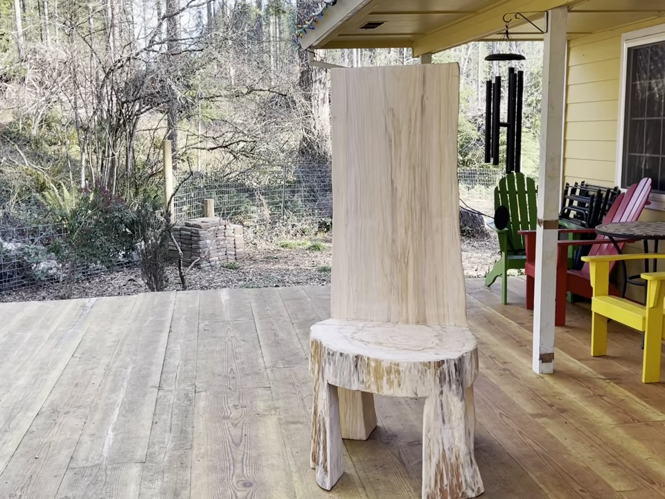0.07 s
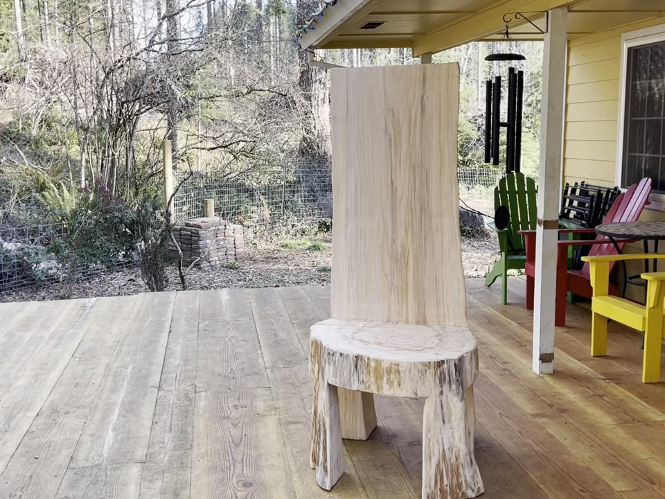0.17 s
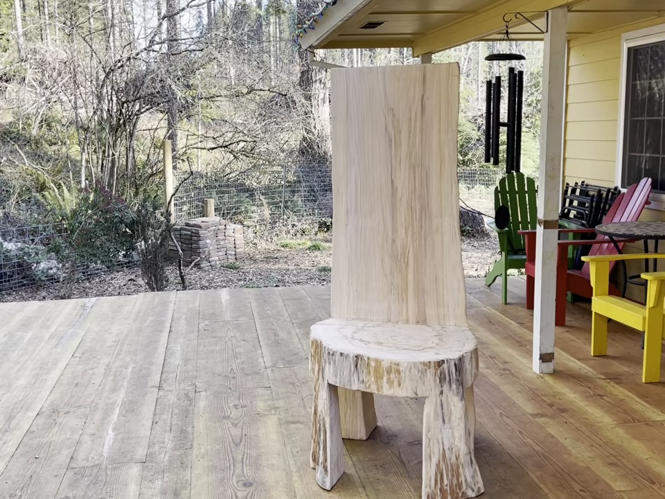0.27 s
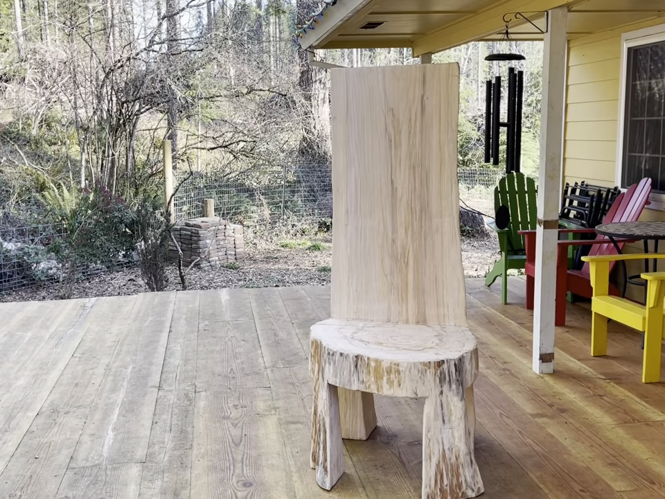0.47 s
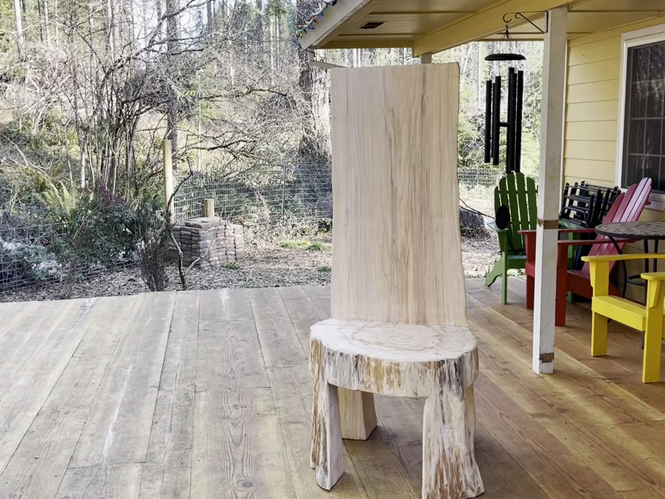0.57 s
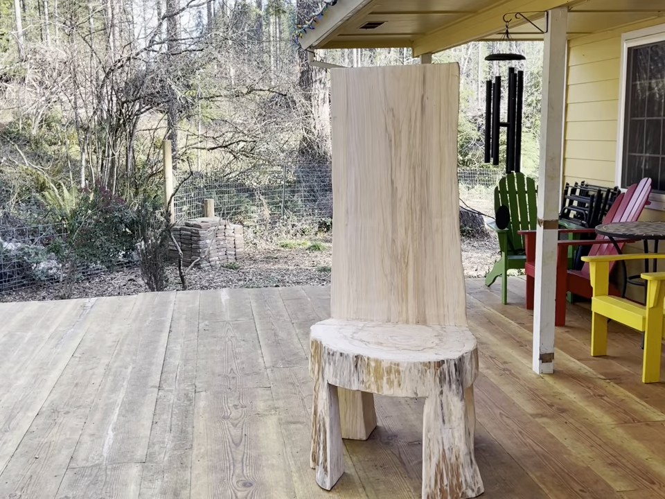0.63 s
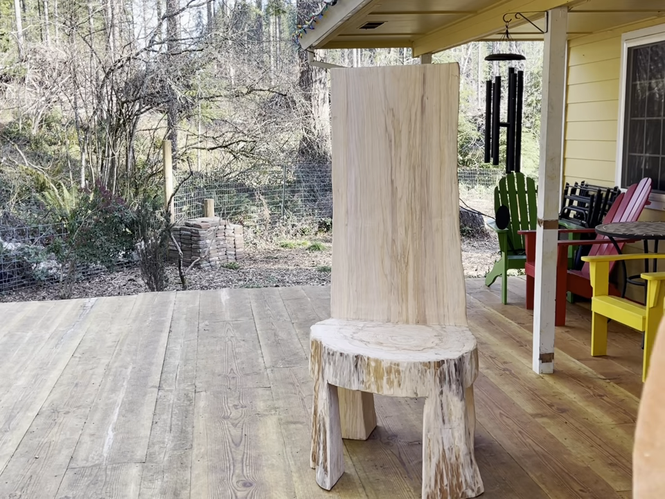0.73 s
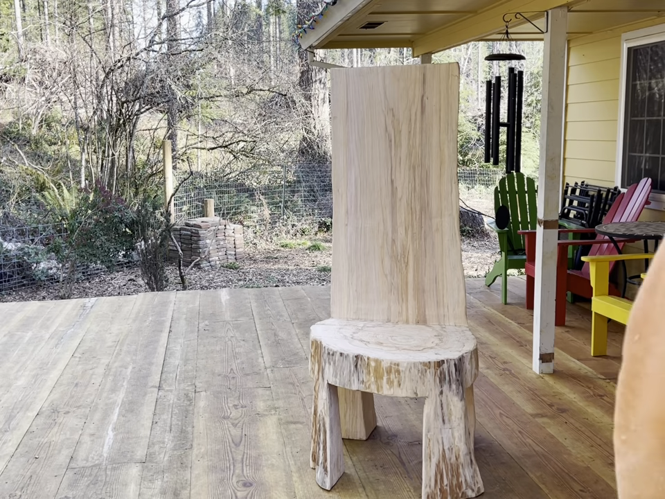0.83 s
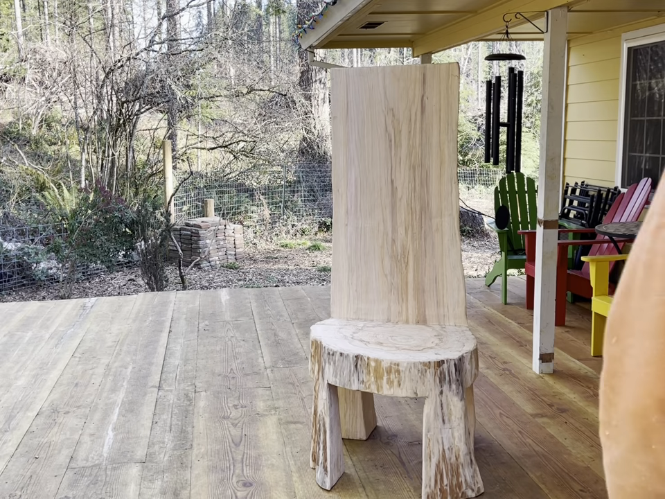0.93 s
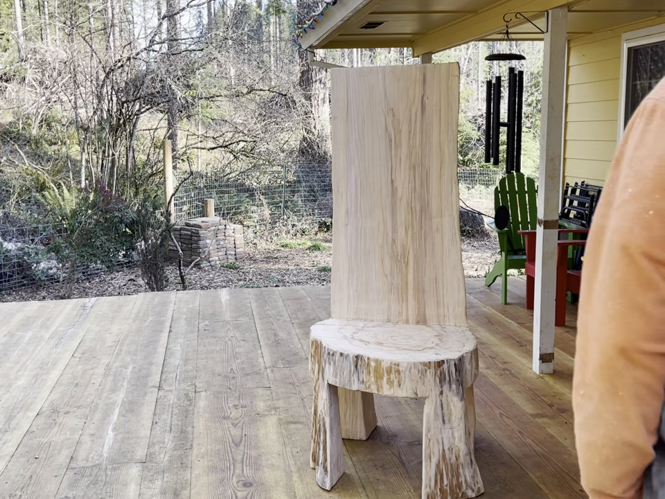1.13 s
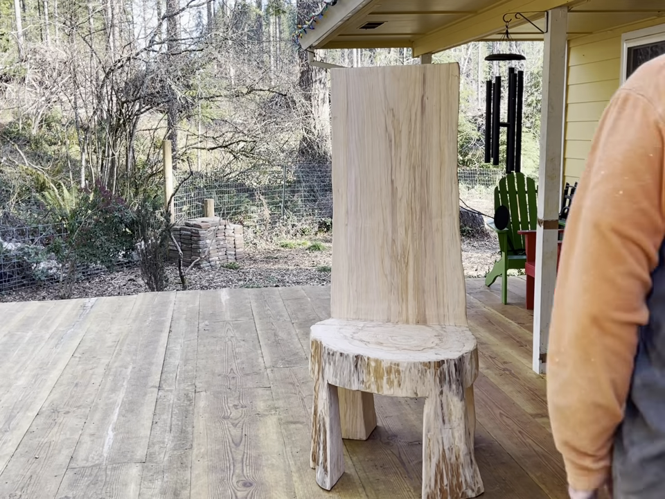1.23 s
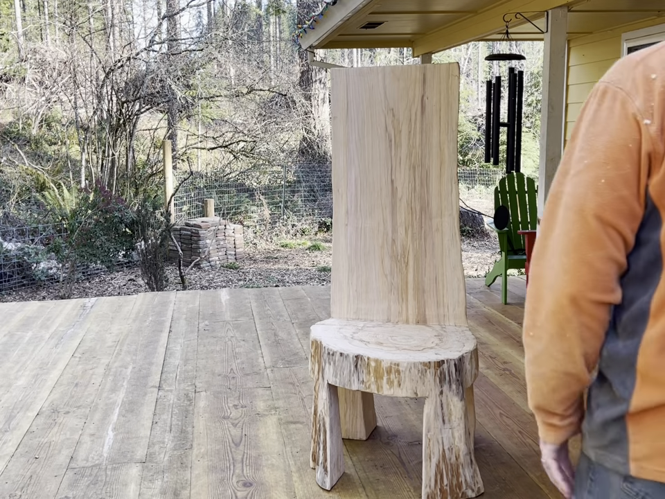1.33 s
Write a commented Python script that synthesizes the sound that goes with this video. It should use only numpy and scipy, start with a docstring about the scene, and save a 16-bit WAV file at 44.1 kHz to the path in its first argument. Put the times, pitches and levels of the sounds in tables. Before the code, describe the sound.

Two slow, heavy footsteps land close by on an outdoor wooden deck. Each heel knocks and booms in the boards before the sole comes down. Clothes swish softly with each stride over a low outdoor rumble.

```python
"""On a wooden deck outdoors, two slow, heavy steps fall close by.
Each heel launches a bending wave along a board, which dispersion turns into a falling sweep.
The body's weight booms in the deck's modes, and the sole slaps down after it, crushing a little grit.
Friction makes the clothes swish with each stride. Behind them are a low outdoor rumble,
a faint far-off whine and one thin bird buzz."""
import sys
import numpy as np
from scipy import signal
from scipy.fft import rfft, irfft
from scipy.io import wavfile

SR = 44100
rng = np.random.default_rng(int(sys.argv[2]) if len(sys.argv) > 2 else 0)


def wav_record(signal):
    """Record a signal, one row per channel, as 16-bit PCM in the file named by sys.argv[1]."""
    frames = np.transpose(np.atleast_2d(signal))
    bounded = np.clip(frames, -1, 1)
    # unit amplitude maps onto the largest positive 16-bit level
    quanta = np.round(bounded * 32767).astype(np.int16)
    wavfile.write(sys.argv[1], SR, quanta)


N = 61739
T = np.arange(N) / SR
HZ = np.fft.rfftfreq(2 * N, 1 / SR)

# Spectrum of the outdoor air (frequency [Hz], relative density [dB])
AIR_SPECTRUM = [(20, -20.5), (40, -6.5), (60, 2), (100, 2), (140, -9.5), (220, -15), (400, -26.5),
                (700, -20), (1200, -33), (1800, -32.5), (3000, -41.5), (6000, -48), (9000, -44.5),
                (13000, -45.5)]
# Left-right likeness of distant sound (frequency [Hz], correlation [-])
AIR_CORRELATION = [(60, 1), (150, 0.94), (300, 0.81), (550, 0.3), (1000, 0.28), (3000, 0.61), (9000, 0.53)]
# Envelope of the whine (time [s], level [dB])
WHINE_ENVELOPE = [(0, -78), (.42, -76.5), (.5, -64.5), (.65, -65.5), (.81, -66.5), (.94, -64.5), (1.1, -72),
                  (1.4, -74.5)]
# Bands of the whine (frequency [Hz], nominal width [Hz], relative level [dB])
WHINE_PEAKS = [(756, 85, 4.5), (894.4, 43, -3.5), (1768, 61, -13.5)]
# Envelopes of the cloth's low rub and fine swish (time [s], level [dB])
RUB_ENVELOPE = [(0, -79), (.06, -68.5), (.13, -74), (.25, -72), (.36, -65.5), (.45, -69), (.6, -72.5),
                (.7, -87), (.85, -84.5), (.96, -65), (1.06, -69.5), (1.17, -67), (1.25, -74.5),
                (1.4, -74.5)]
SWISH_ENVELOPE = [(0, -80), (.11, -76), (.17, -85), (.21, -76.5), (.25, -68), (.36, -75.5), (.43, -65),
                  (.52, -71), (.6, -72), (.66, -94), (.89, -78), (.925, -74), (.95, -64.5), (1.03, -64.5),
                  (1.1, -70.5), (1.18, -66), (1.24, -72), (1.3, -81.5)]
# Spectra of the rub and the swish (frequency [Hz], relative density [dB])
RUB_SPECTRUM = [(200, -7), (600, -1), (1700, 2.5), (2800, -5.5), (4500, -12.5), (9000, -25)]
SWISH_SPECTRUM = [(1000, -16), (2800, -0.5), (4500, -1.5), (6500, -1), (9000, 1.5), (13000, -1)]
# Left-right likeness of cloth and grit (frequency [Hz], correlation [-])
FRICTION_CORRELATION = [(300, 0.17), (2000, 0.42), (5000, 0.66), (10000, 0.45)]
# Heel strikes, settling weight and sole slaps (time [s], relative level [dB], low corner [Hz],
# high corner [Hz], group delay at 1 kHz [ms], scatter gain [dB], ring gain [dB], left minus right [dB])
FOOT_CONTACTS = [(0.1909, -17.5, 160, 421, 3.3, -2.5, -3, -2.5), (.1924, -31, 870, 1005, 1.8, -0.5, 9, -6),
                 (.1920, -53, 1980, 2700, 1.15, 3, -10, 2), (.2100, -9.5, 49, 220, 1.595, -10, -8.5, 0),
                 (0.2507, -17, 53.7, 134, 1.32, -4, -8, 1.5),
                 (0.2763, -46.5, 404, 1340, 1.41, -4, 11, -2.5),
                 (0.343, -32, 44.7, 220, 1.644, -13, -1, -1), (0.9329, -22, 163, 301, 4.727, -9, -6.5, 1),
                 (.9345, -48, 680, 880, 3.09, -1.5, 18, -9), (.9525, -20.5, 50.3, 221, 1.787, -11, -8, 2),
                 (0.982, -20, 43.6, 175, 1.45, -7, -11.5, -0.5),
                 (1.0612, -29.5, 49.3, 156, 1.64, -9, -8, -1),
                 (1.0661, -29.5, 390, 740, 2.08, -6, -2.5, -5),
                 (1.0670, -46.5, 1700, 2480, 1.4, -21, -17, 2),
                 (1.0749, -58.5, 890, 2240, 1.4, 10, -18, -3.5),
                 (1.1080, -32.5, 111, 280, 1.75, -5.5, -3.5, -0.5),
                 (1.1360, -31.5, 49.7, 189, 1.47, -4, -8.5, 1), (1.156, -54, 1300, 2100, 1.44, -4, -2, -4)]
# Short knock of the struck board (frequency [Hz], width [Hz], gain [dB])
BOARD_RESONANCES = [(428, 197, -3), (650, 110, -7), (745, 123, 5), (1034, 92, 7.5), (1132, 135, 1),
                    (1572, 68, 4.5), (2990, 240, -1.5)]
# Left-right likeness of the scattered waves (frequency [Hz], correlation [-])
SCATTER_CORRELATION = [(60, 0.88), (300, 0.6), (550, 0.61), (1000, -0.12), (2000, 0.41), (9000, -0.9)]
# Damping of the scattered waves (frequency [Hz], 60 dB decay time [s])
SCATTER_DECAY = [(50, 0.22), (150, 0.46), (350, 0.41), (700, 0.27), (1500, 0.18), (4000, .16),
                 (12000, 0.075)]
# Modes of boards and joists (frequency [Hz], relative level [dB], 60 dB decay time [s])
DECK_MODES = [(63, -3.5, 0.6), (79.8, 1, 0.44), (96.3, -6, 0.31), (126.5, -7.5, 0.37), (151, -4, 0.22),
              (176.2, -7, 0.2), (220, -1.5, 0.3), (247.7, -6, 0.38), (280, -0.5, 0.32), (309, -9.5, 0.47),
              (350.9, -1.5, 0.42), (451.3, -11, 0.48), (625, -17, 0.4), (834, -12.5, 0.26)]
# Crunches under the sole (time [s], level [dB], 60 dB decay time [s])
GRIT_BURSTS = [(0.1937, -58, 0.03), (0.2805, -61, .04), (0.462, -72, 0.6), (0.936, -60, 0.13),
               (0.959, -63, 0.03)]
# Spectrum of the grit (frequency [Hz], relative density [dB])
GRIT_SPECTRUM = [(800, 4), (2500, 6.5), (5000, -1), (9000, -1), (13000, -4)]
# The bird's two tones (frequency [Hz], width [Hz], relative level [dB])
BIRD_PEAKS = [(8060, 530, -0.083), (8720, 560, -0.87)]
# Microphone pair's response: sum, difference, left minus right (frequency [Hz], gain [dB])
MID_RESPONSE = [(20, 2.5), (7000, -3.5), (8800, 2.5), (9700, -3), (10300, -13), (10900, -1), (11800, -9),
                (13000, -20)]
SIDE_RESPONSE = [(20, 4.5), (7700, -2.5), (8500, -3.5), (9400, 7), (10600, 9), (11400, -1), (12000, -41)]
BALANCE_RESPONSE = [(100, 0), (350, 1.5), (900, 1), (2000, 2.5), (4000, 5), (8000, 1), (12000, -0.5)]


def amp(db):
    """Amplitude ratio of a level in decibels."""
    return 10 ** (np.asarray(db) / 20)


def unit(x):
    """Normalisation to rms 1."""
    return x / np.sqrt(np.mean(x ** 2) + 1e-20)


def log_interp(points, hz):
    """Interpolation on a log-frequency axis."""
    f, value = np.transpose(points)
    return np.interp(np.log(hz + 1), np.log(f + 1), value)


def response(points):
    """Gain on HZ from (frequency [Hz], level [dB])."""
    return amp(log_interp(points, HZ))


def envelope(points):
    """Gain on T from (time [s], level [dB])."""
    return amp(np.interp(T, *np.transpose(points)))


def bands(rows):
    """Superposition of Lorentzian peaks on HZ."""
    return sum(amp(db) / (1 + (2 * (HZ - hz) / width) ** 2) for hz, width, db in rows)


def colour(x, gain):
    """Filtering as multiplication of the spectrum by a gain on HZ."""
    return irfft(rfft(x, 2 * N) * gain)[..., :N]


def flutter(rate_hz):
    """Low-passed noise: a random wandering of rms 1."""
    return unit(colour(rng.standard_normal(N), 1 / (1 + (HZ / rate_hz) ** 4)))


def stereo_noise(correlation, gain=1):
    """Partial coherence: two independent noises mix to a given left-right correlation."""
    a, b = rfft(rng.standard_normal((2, 2 * N)))
    likeness = np.clip(log_interp(correlation, HZ), -.999, .999)
    mid, side = a * np.sqrt(1 + likeness), b * np.sqrt(1 - likeness)
    return unit(irfft(np.array([mid + side, mid - side]) * gain)[:, :N])


def whine(waver_db=4):
    """Narrow-band noise: each band of a far-off whine swells and fades by its own random modulation."""
    tones = 0
    for hz, width, db in WHINE_PEAKS:
        swell = amp(db + waver_db * flutter(rate_hz=13))
        tones += swell * stereo_noise(AIR_CORRELATION, bands([(hz, width, 0)]) ** 1.08)
    return envelope(WHINE_ENVELOPE) * unit(tones)


def air(level_db=-56):
    """Stationary ambient noise: a rumble nearly coherent between the sides, and a soft hiss."""
    return amp(level_db) * stereo_noise(AIR_CORRELATION, response(AIR_SPECTRUM))


def clothes(grain_db=1.7):
    """Sliding friction: cloth rubs and swishes in fine grains as the legs swing."""
    rustle = 0
    for stride, spectrum in [(RUB_ENVELOPE, RUB_SPECTRUM), (SWISH_ENVELOPE, SWISH_SPECTRUM)]:
        grains = amp(grain_db * flutter(rate_hz=170))
        friction = stereo_noise(FRICTION_CORRELATION, response(spectrum))
        rustle += envelope(stride) * unit(grains * friction)
    return rustle


def foot_contact(start, db, low_hz, high_hz, delay_ms, scatter_db, ring_db, pan_db):
    """Dispersion: a soft impact sends bending waves that bring treble before bass; the deck rings on."""
    treble_cut = 1 / np.hypot(1, (HZ / high_hz) ** 4.45) + amp(-71)  # a faint flat floor keeps a thin click of treble in every contact
    bass_cut = 1 / np.hypot(1, (low_hz / (HZ + 1)) ** 2.3)
    softness = 1 / (1 + 1j * HZ / high_hz)  # only its phase lag is used
    force = treble_cut * bass_cut * softness / abs(softness)
    bending_cycles = 2 * delay_ms / 1000 * np.sqrt(1000 * HZ)  # group delay goes as 1 / sqrt(frequency)
    travel = np.exp(-2j * np.pi * (HZ * start + bending_cycles))
    impulse = T == 0
    deck = impulse + amp(scatter_db) * deck_scatter() + amp(ring_db) * deck_ring()
    pan = amp([[pan_db / 2], [-pan_db / 2]])
    return amp(db + 28.5) * pan * colour(deck, force * board_response() * travel)


def board_response():
    """Damped resonance: the struck board's gain on HZ is a flat push plus a short knock."""
    return 1 + sum(amp(db) / (1 + 2j * (HZ - hz) / width) for hz, width, db in BOARD_RESONANCES)


def deck_scatter(rise_s=0.0046):
    """Multiple reflection between joists, rails and roof: a dense tail whose treble dies first."""
    hz, t, spectra = signal.stft(stereo_noise(SCATTER_CORRELATION), SR, nperseg=512)
    decay = amp(-60 * t / log_interp(SCATTER_DECAY, hz)[:, None])
    tail = signal.istft(spectra * decay, SR, nperseg=512)[1][:, :N]
    build_up = np.minimum(T / rise_s, 1) ** 2
    return tail * build_up / np.sqrt(SR * 0.017)


def deck_ring():
    """Modal superposition: away from the foot, neighbouring modes of the deck swing opposite ways."""
    return amp(-48) * sum((-1) ** k * amp(db - 60 * T / t60) * np.sin(2 * np.pi * hz * T)
                          for k, (hz, db, t60) in enumerate(DECK_MODES))


def grit():
    """Crushing of grit between sole and board: noise bursts with exponential decay."""
    bursts = sum((T >= start) * amp(db - 60 * abs(T - start) / t60) for start, db, t60 in GRIT_BURSTS)
    return bursts * stereo_noise(FRICTION_CORRELATION, response(GRIT_SPECTRUM))


def bird(start_s=0.73, length_s=0.15, attack_s=0.0054, release_s=0.075, trill_hz=88, depth=0.17):
    """Amplitude modulation of two high noise bands: a short, buzzy trill."""
    t = T - start_s
    shape = np.clip(t / attack_s, 0, 1) * np.clip((length_s - t) / release_s, 0, 1)
    trill = 1 - depth * np.cos(2 * np.pi * trill_hz * t)
    return amp(-78) * shape * trill * stereo_noise(AIR_CORRELATION, bands(BIRD_PEAKS))


def scene():
    """Linear superposition of the distant sounds, the clothes and the steps."""
    distant = whine() + air() + bird()
    return distant + clothes() + grit() + sum(foot_contact(*row) for row in FOOT_CONTACTS)


def record(dry, cutoff_hz=12950):
    """Mid-side filtering: the microphone pair colours the sound, then a low-pass limits its band."""
    mid = colour((dry[0] + dry[1]) / 2, response(MID_RESPONSE))
    side = colour((dry[0] - dry[1]) / 2, response(SIDE_RESPONSE))
    lean = np.sqrt(response(BALANCE_RESPONSE))
    stereo = colour(np.array([mid + side, mid - side]), np.array([lean, 1 / lean]))
    low_pass = signal.firwin(511, cutoff_hz, window=("kaiser", 9), fs=SR)
    return signal.oaconvolve(stereo, low_pass[None], "same")


dry = scene()
out = record(dry)
wav_record(out)
```